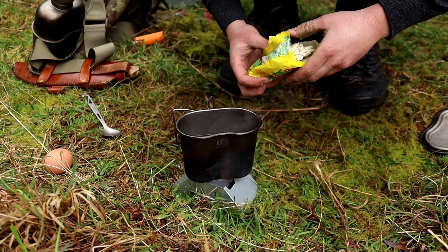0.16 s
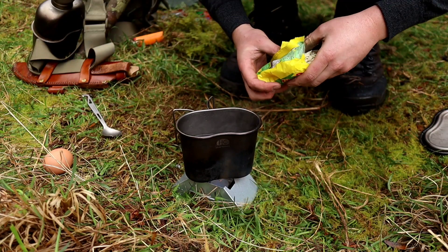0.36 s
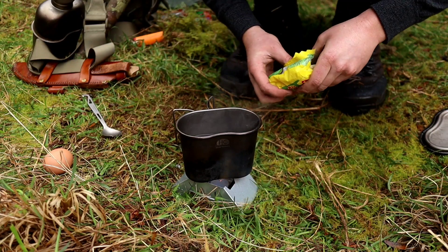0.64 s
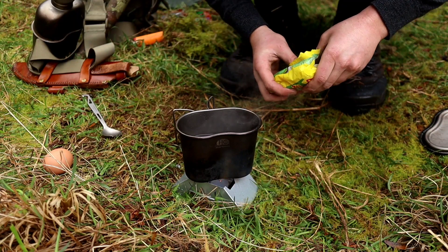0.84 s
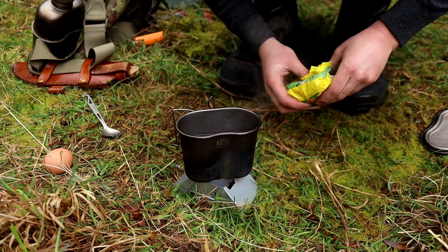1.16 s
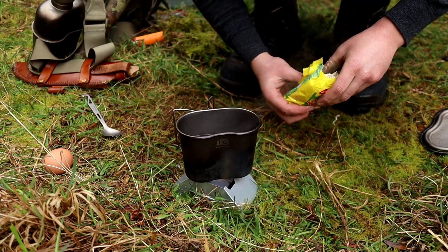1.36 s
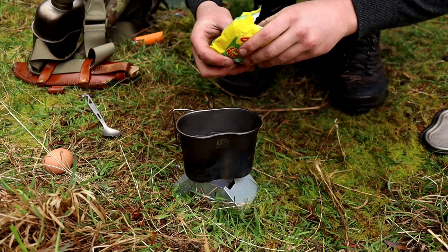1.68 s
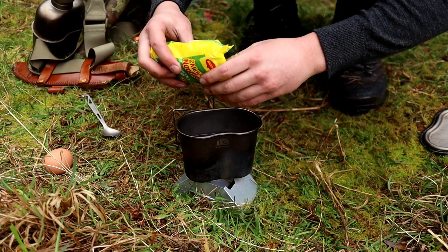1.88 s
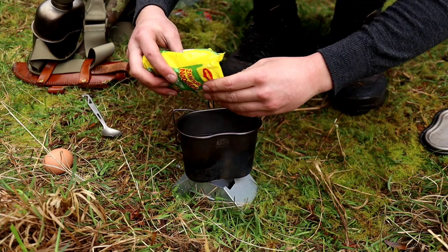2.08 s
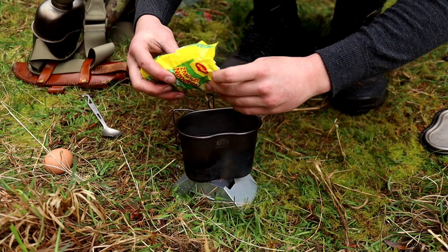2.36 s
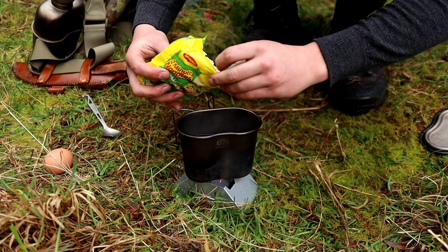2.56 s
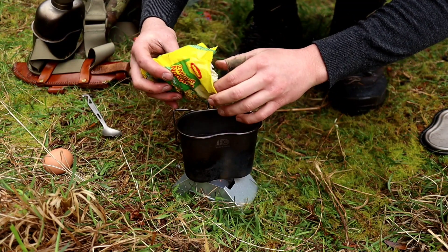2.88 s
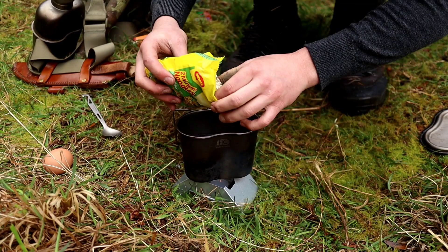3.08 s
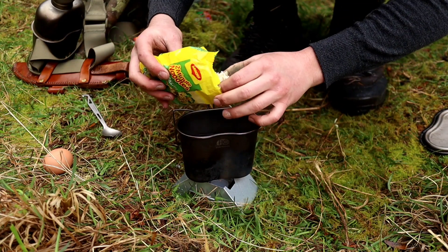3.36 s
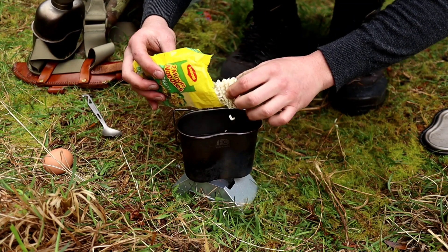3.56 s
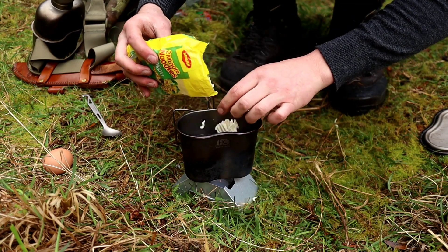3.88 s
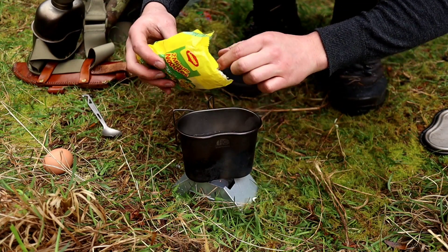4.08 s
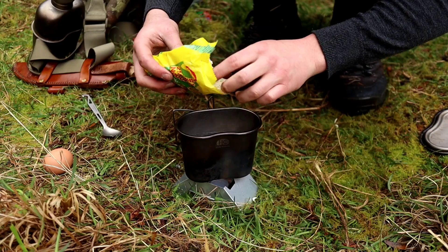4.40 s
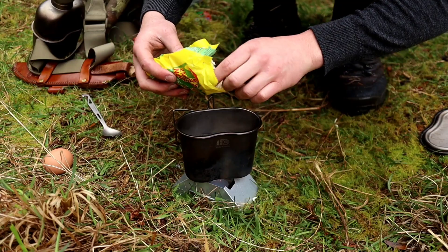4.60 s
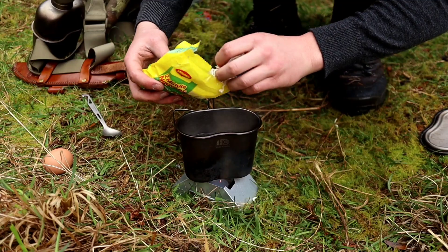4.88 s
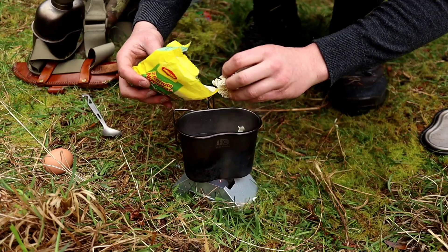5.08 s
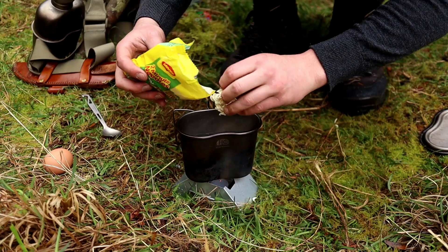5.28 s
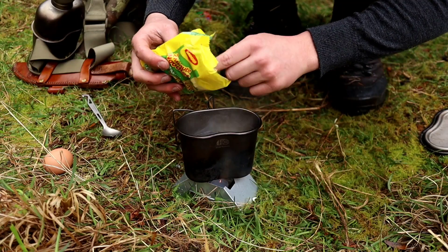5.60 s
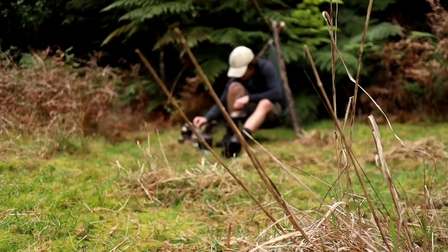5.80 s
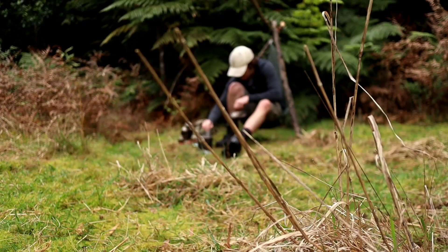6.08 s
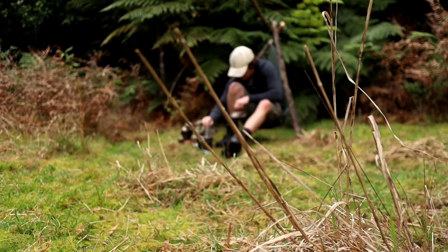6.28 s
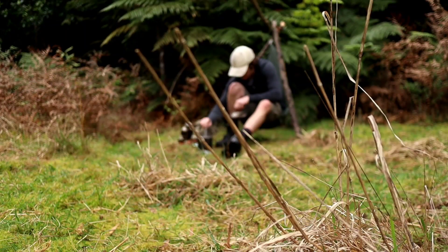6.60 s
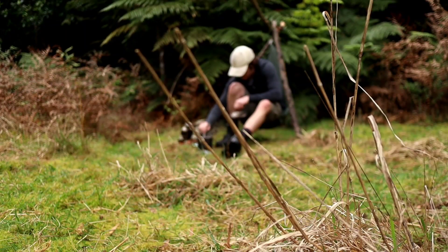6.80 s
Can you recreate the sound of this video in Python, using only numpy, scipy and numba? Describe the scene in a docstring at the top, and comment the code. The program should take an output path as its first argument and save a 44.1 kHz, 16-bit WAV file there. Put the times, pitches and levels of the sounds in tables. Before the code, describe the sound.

Close to the microphone, hands squeeze a plastic noodle packet in uneven bursts of crinkles and sharp little snaps. Early on, the dry block breaks with a loud crunch and a soft thump. Lighter rustling continues, a few pieces drop into a metal pot with brief ringing ticks, and crumbs slide along the metal. The close sounds then cut off, leaving faint forest hiss, a light breeze and one tiny tick.

```python
"""A plastic noodle packet is squeezed by hand: its film buckles in clumps of tiny cracks that excite the
hollow body, creases snap, and the dry block breaks and thumps against the palm. Pieces drop into a metal
cooking pot and ring its modes, crumbs slide along the metal, and the grassy clearing scatters the sound.
Near the end the listening point jumps far away, where only the soft hiss of the forest remains,
with a light breeze and one faint tick."""
import sys
import numpy as np
from scipy import signal
from scipy.fft import rfft, irfft, next_fast_len
from scipy.io import wavfile
from scipy.ndimage import map_coordinates
from numba import njit

SR = 44100
rng = np.random.default_rng(int(sys.argv[2]) if len(sys.argv) > 2 else 0)


def wav_out(sig):
    """Save sig, one row per channel (or a flat mono array), as 16-bit PCM at SR to the path in sys.argv[1]."""
    wavfile.write(sys.argv[1], SR, np.round(np.clip(np.atleast_2d(sig).T, -1, 1) * 32767).astype(np.int16))


N = 306318


def amp(db):
    return 10 ** (np.asarray(db) / 20)


def unit_rms(x):
    return x / np.sqrt(np.mean(x ** 2) + 1e-20)


def envelope(points):
    """Linear interpolation of (time [s], value) points, one value a sample."""
    return np.interp(np.arange(N) / SR, *np.transpose(points))


def wobble(rate_hz):
    """Smooth random modulation: a spline through Gaussian knots."""
    knots = rng.standard_normal(int(N * rate_hz / SR) + 4)
    return map_coordinates(knots, [np.arange(N) * rate_hz / SR])


def filtered(x, points, causal=False):
    """Spectral shaping by (frequency [Hz], gain [dB]) points; causal (minimum phase) keeps attacks sharp."""
    size = 2 * next_fast_len(N // 2 + 4096)
    hz, db = np.transpose(points)
    bin_hz = np.fft.rfftfreq(size, 1 / SR)
    gain = amp(np.interp(np.log(bin_hz + 1), np.log(hz + 1), db))
    if causal:
        cepstrum = irfft(np.log(gain), size)
        cepstrum[1:size // 2] *= 2
        cepstrum[size // 2 + 1:] = 0
        gain = np.exp(rfft(cepstrum))
    return irfft(rfft(x, size) * gain, size)[:N]


@njit
def add_sines(out, start, step, decay, size, phase):
    """Damped sines swell over their first cycle; step [rad] and decay [Np] are per sample."""
    for g in range(len(start)):
        for i in range(min(int(7 / decay[g]), len(out) - start[g])):
            swell = 1 - np.exp(-step[g] * i / 3)
            out[start[g] + i] += size[g] * swell * np.exp(-decay[g] * i) * np.sin(step[g] * i + phase[g])


def rings(*modes):
    """Superposition of damped modes: (onset [s], frequency [Hz], T60 [s], amplitude, phase [rad])."""
    onset, hz, t60, size, phase = (np.ravel(v).astype(float) for v in np.broadcast_arrays(*modes))
    start = np.clip(onset * SR, 0, N - 1).astype(np.int64)
    step = 2 * np.pi * np.clip(hz, 20, SR / 2.2) / SR
    decay = np.log(1000) / (np.abs(t60) * SR + 1)
    out = np.zeros(N)
    add_sines(out, start, step, decay, size, phase)
    return out


def crackle(flips, cracks, centre_hz, octaves, cycles, scatter_db):
    """Buckling: creases flip at random, each in a cluster of cracks that ring for a few cycles."""
    onset = rng.random((flips, 1)) * N / SR
    flip_pitch = rng.standard_normal((flips, 1))
    flip_db = scatter_db * np.minimum(rng.exponential(size=(flips, 1)), 3)
    delay = rng.laplace(.0006, .0016, (flips, cracks))
    phase = 2 * np.pi * rng.random((flips, cracks))
    crack_pitch = rng.standard_normal((flips, cracks))
    hz = centre_hz * 2 ** (octaves * (.67 * flip_pitch + .7 * crack_pitch))
    return unit_rms(rings(onset + delay, hz, cycles / hz, amp(flip_db - 2000 * np.abs(delay)), phase))


# Rustle of the handled film: (time [s], level [dB])
FILM_LEVEL = [(0.0, -46.5), (0.02, -57), (0.04, -51), (0.2, -55.0), (0.25, -49.5), (0.31, -57), (0.41, -47),
              (0.49, -55), (0.54, -44.5), (0.58, -42.5), (0.61, -49.0), (0.68, -33), (0.8, -41.5),
              (0.94, -54.5), (1.03, -45.5), (1.11, -59), (1.15, -38), (1.165, -22.5), (1.195, -14),
              (1.215, -33.5), (1.23, -39.5), (1.28, -49), (1.31, -34.5), (1.33, -52), (1.36, -38),
              (1.43, -49), (1.51, -42.5), (1.54, -48.5), (1.72, -63), (1.96, -48.5), (1.99, -53.5),
              (2.13, -49.5), (2.19, -52.5), (2.34, -54.5), (2.39, -42), (2.45, -54.0), (2.52, -54),
              (2.57, -51), (2.65, -58.5), (2.68, -41.5), (2.71, -58), (2.73, -38), (2.82, -50.5),
              (2.85, -44), (2.95, -51.5), (3.04, -45), (3.09, -45.5), (3.12, -56), (3.24, -45), (3.33, -52),
              (3.44, -33), (3.56, -49.0), (3.61, -42.5), (3.77, -45), (3.9, -51.5), (3.94, -58.5),
              (4.0, -55.5), (4.03, -71), (4.09, -52.5), (4.15, -39.5), (4.21, -65.5), (4.27, -60),
              (4.31, -37.5), (4.35, -57.5), (4.39, -42), (4.41, -44.5), (4.45, -54), (4.5, -54.5),
              (4.6, -38.0), (4.65, -56.5), (4.73, -45.5), (4.88, -48.5), (5.01, -37), (5.05, -52),
              (5.12, -56), (5.18, -39), (5.23, -42), (5.32, -65), (5.51, -63), (5.56, -54), (5.69, -61.5),
              (5.74, -30), (5.83, -50), (5.87, -29.0)]
# Spectral tilt of the film: (frequency [Hz], gain [dB])
FILM_SPECTRUM = [(900, 1), (1800, 4), (4000, 2), (8000, 1), (15000, 2.5)]
# Response of the packet's hollow body: (frequency [Hz], gain [dB])
BODY_SPECTRUM = [(100, -15), (200, -7), (450, -5), (620, -8), (1000, 2.5), (1500, 0), (2600, -40.5)]
# Strength of the body as the grip changes: (time [s], gain [dB])
GRIP_GAIN = [(0, 1.5), (1, -7), (1.6, -1), (3.3, -2), (4.3, -1.5), (5.87, -3.5)]
# Held tight around the block, the body sounds higher: (frequency [Hz], gain [dB])
TIGHT_SPECTRUM = [(250, -6), (900, -4.5), (1700, 4)]
# The loosening grip: (time [s], tightness [0-1])
TIGHTNESS = [(1.3, 0.94), (1.9, 0.06)]


def packet_rustle():
    """Bursts of buckling excite film and hollow body; hard squeezing merges the cracks into noise."""
    film_db = envelope(FILM_LEVEL)
    bursts = .25 * wobble(30) + .55 * wobble(75)
    merged = np.clip((film_db + 46.5) / 14, 0, 1)
    cracks = crackle(flips=3000, cracks=10, centre_hz=5260, octaves=1, cycles=4.1, scatter_db=4.5)
    cracks = unit_rms(filtered(cracks * amp(1.17 * bursts), FILM_SPECTRUM, causal=True))
    rush = unit_rms(filtered(rng.standard_normal(N) * amp(1.4 * bursts), FILM_SPECTRUM))
    film = (1 - .44 * merged) * cracks + (amp(-28.5) + .31 * merged) * rush
    body = crackle(flips=3000, cracks=3, centre_hz=770, octaves=.992, cycles=8.3, scatter_db=3)
    loose = unit_rms(filtered(body * amp(2.7 * bursts), BODY_SPECTRUM, causal=True))
    tight = unit_rms(filtered(loose, TIGHT_SPECTRUM, causal=True))
    tightness = envelope(TIGHTNESS)
    body = tightness * tight + (1 - tightness) * loose
    body_db = film_db + envelope(GRIP_GAIN) - .32 * (film_db + 51)  # the body swells less than the film
    return amp(film_db) * film + amp(body_db) * body


# Creases and noodles that snap: (time [s], level [dB], centre frequency [Hz])
SNAPS = [(0.0456, -29, 7160), (0.075, -24.5, 7750), (0.088, -26.5, 4470), (0.1112, -27, 4500),
         (0.2517, -23, 2550), (0.2918, -26, 6700), (0.316, -32, 6600), (0.42, -20.5, 2980),
         (0.4454, -30, 7100), (0.512, -29.5, 5000), (0.5298, -22, 6300), (0.5448, -22, 6000),
         (0.5666, -22, 4500), (0.574, -14.5, 7340), (0.639, -16, 7700), (0.6835, -25, 8100),
         (0.6892, -21, 2960), (0.7007, -22, 6640), (0.7114, -28, 6600), (0.7534, -30, 6660),
         (0.7928, -19.5, 4700), (0.8226, -22.5, 6600), (0.828, -36, 6300), (0.8665, -16.5, 7500),
         (0.9122, -20.5, 4750), (0.9532, -25, 4800), (0.9648, -29, 5000), (0.9853, -20.5, 3600),
         (1.0071, -25, 4600), (1.0127, -19, 2710), (1.0382, -11.5, 2750), (1.067, -22, 6500),
         (1.0732, -21.5, 4100), (1.1312, -24.5, 5530), (1.1382, -21, 5530), (1.1637, -1, 3500),
         (1.1817, -12.5, 3000), (1.219, -16, 6500), (1.2279, -2.5, 3000), (1.2556, -27, 2600),
         (1.3068, -17.5, 3950), (1.3107, -22.5, 2400), (1.3187, -25, 6600), (1.3469, -30, 6200),
         (1.4834, -23.5, 2800), (1.5192, -17, 4460), (1.6052, -25, 2900), (1.665, -21, 4570),
         (1.742, -22, 4000), (1.7796, -28, 3940), (1.9519, -29, 3200), (2.0259, -27, 4800),
         (2.0488, -21, 3670), (2.116, -22, 3600), (2.1462, -26.5, 6300), (2.3147, -19.5, 5460),
         (2.4214, -26, 5900), (2.5933, -25.5, 6800), (2.6122, -26.5, 6800), (2.6658, -11.5, 4100),
         (2.683, -25, 4100), (2.7212, -24.5, 8000), (2.7472, -25, 5100), (2.765, -38, 3100),
         (2.777, -21, 2900), (2.8358, -13.5, 5240), (2.8814, -29, 5000), (3.0123, -39, 5900),
         (3.026, -18.5, 6900), (3.0363, -21, 6400), (3.1026, -20, 5770), (3.1759, -25, 3100),
         (3.3628, -29, 5800), (3.3985, -18.5, 4380), (3.4382, -19, 5700), (3.4461, -16, 6400),
         (3.453, -22.5, 6300), (3.5173, -20.5, 4000), (3.5344, -21.5, 2600), (3.5884, -26, 6000),
         (3.6157, -16, 7800), (3.6555, -17, 2400), (4.0744, -33.5, 8000), (4.1256, -31, 6500),
         (4.1363, -35, 6040), (4.1568, -26.5, 2500), (4.2106, -36, 6000), (4.307, -19.5, 7160),
         (4.3137, -25, 3520), (4.3667, -25, 3500), (4.3836, -17.5, 5300), (4.3985, -29, 3700),
         (4.444, -17.5, 6430), (4.45, -11, 5060), (4.573, -21, 2900), (4.5868, -19, 7900),
         (4.6079, -20.5, 6240), (4.6402, -28, 6600), (4.7153, -20.5, 7000), (4.7494, -25, 4800),
         (4.8263, -21.5, 4900), (4.9702, -19.5, 5300), (5.0216, -23, 4370), (5.0328, -24.5, 2800),
         (5.083, -22, 3460), (5.105, -24, 3940), (5.1955, -19, 3600), (5.5274, -32, 3600),
         (5.5343, -22, 6840), (5.67, -34, 3200), (5.7335, -20, 2700), (5.745, -15, 5130),
         (5.8294, -28, 3200), (5.8568, -27, 3600), (5.8652, -17, 6400)]


def snaps():
    """Sudden stress release: tight clusters of cracks, each inside a weaker shiver of the film."""
    onset, snap_db, centre_hz = np.transpose(SNAPS)[:, :, None]
    bands = 14
    part = np.arange(2 * bands)
    shiver = part >= bands  # each band holds one crack and one shiver
    place, lag, phase, scatter = np.moveaxis(rng.random((len(SNAPS), 4, len(part))), 1, 0)
    hz = 450 * 33 ** ((part % bands + place) / bands)
    tear_s = .0005 + .004 * amp(snap_db)  # big snaps tear longer
    delay = np.where(shiver, .008 * (lag - .45), tear_s * lag)
    octaves = np.log2(hz / centre_hz)
    rolloff_db = np.where(octaves < 0, 5, 4.5) * np.abs(octaves)
    level_db = snap_db - 4 - rolloff_db - 8 * shiver + 11.7 * (scatter - .5)
    t60 = .0022 + 3.1 / hz  # low parts ring longer
    return rings(onset + delay, hz, t60, amp(level_db), 2 * np.pi * phase)


# Blows of the block against the palm: (time [s], level [dB], lower mode frequency [Hz])
THUMPS = [(1.226, -11, 520), (3.428, -27, 278), (3.608, -30, 380), (4.048, -35.5, 197), (4.146, -28, 457),
          (4.447, -34, 312), (5.02, -31.5, 220), (5.74, -22.5, 297)]


def palm_thumps():
    """A soft impact excites two close, heavily damped low modes."""
    onset, db, hz = np.transpose(THUMPS)[:, :, None]
    return rings(onset, hz * [1, 1.3], 9 / hz, amp(db + [0, -5]), 0)


# Pieces that strike the pot: (time [s], level [dB], frequency favoured by the contact point [Hz])
DROPS = [(3.902, -40, 1630), (3.9576, -21.5, 6000), (5.162, -34, 1450), (5.275, -39.5, 1770)]
# Modes of the pot: (frequency [Hz], level [dB], T60 [s])
POT_MODES = [(1227, -6, .04), (1670, -3, .13), (3112, 0, .075), (5539, -13, .06), (6821, -21, .14),
             (8484, -10, .06), (8888, -2, .04), (9502, -7, .045), (11300, 0, .03), (12080, -3, .05),
             (12850, -2, .045)]


def pot_impacts():
    """Modal excitation: bouncing pieces clatter and ring the pot; the contact point weights the modes."""
    out = np.zeros(N + SR)
    hz, mode_db, t60 = np.transpose(POT_MODES)
    t = np.arange(SR // 8) / SR
    bounce_s = np.array([[0], [.004], [.009]])
    for onset, db, favoured_hz in DROPS:
        level_db = db + mode_db - 10 * np.abs(np.log2(hz / favoured_hz)) - 900 * bounce_s
        phase = 2 * np.pi * rng.random(level_db.shape)
        out[:N] += rings(onset + bounce_s, hz, t60, amp(level_db), phase)
        clatter = np.diff(rng.standard_normal(len(t) + 1)) * amp(-60 * t / .045)
        out[round(onset * SR):][:len(t)] += amp(db - 2.5) * clatter
    return out[:N]


# Crumbs sliding into the pot: (time [s], level [dB])
CRUMB_LEVEL = [(5.24, -57.5), (5.3, -59), (5.52, -65.5), (5.55, -45), (5.63, -50), (5.68, -91)]


def sliding_crumbs():
    """Friction noise of fine crumbs on metal, shaped by the resonances of the pot wall."""
    wall = [(500, -25), (1250, 0), (2600, -13), (4600, -13),
            (5600, -5), (6500, -10), (8300, -6), (15000, -11)]
    level_db = envelope(CRUMB_LEVEL) + 2.1 * wobble(60)
    return amp(level_db) * unit_rms(filtered(rng.standard_normal(N), wall))


def ground_scatter(x, t60=.093, delay_samples=70):
    """Diffuse reflection from nearby grass and gear: convolution with a short noise tail."""
    t = np.arange(SR // 10) / SR
    tail = rng.standard_normal(len(t)) * amp(-60 * t / t60)
    return signal.fftconvolve(x, np.pad(tail / np.linalg.norm(tail), (delay_samples, 0)))[:N]


# Hiss of the forest: (frequency [Hz], gain [dB])
FOREST_SPECTRUM = [(41, -42.5), (70, -12.5), (158, -7), (232, -10.5), (260, -12.5), (417, -17), (1150, -14),
                   (1380, -12), (14500, -37), (15500, -37)]
# Breeze on the microphone: (time [s], level [dB])
BREEZE_LEVEL = [(0, -76), (1.5, -73), (3, -77.5), (6.45, -71.5), (6.75, -64.5), (6.95, -67)]


def forest(tick_s=6.812):
    """Stationary noise of far leaves, the fluctuating rumble of a breeze and one faint tick of a twig."""
    hiss = unit_rms(filtered(rng.standard_normal(N), FOREST_SPECTRUM))
    rumble = filtered(rng.standard_normal(N), [(15, -18), (30, -12), (120, -48.5)])
    breeze = unit_rms(rumble * amp(1.8 * wobble(10)))
    twig = rings(tick_s, [7000, 8600, 12500], .003, amp(-46), 0)
    return amp(-59) * hiss + amp(envelope(BREEZE_LEVEL)) * breeze + twig


# Microphone response to the near sources: (frequency [Hz], gain [dB])
MIC_RESPONSE = [(60, -31), (150, -7.5), (260, -1.5), (4800, 2), (6300, 2.5), (8500, 8), (9300, 3.5),
                (10100, -6.5), (11200, 2), (12600, 5.5), (15400, 0)]


def scene(jump_s=5.868):
    """Superposition: packet and pot sound until the listening point jumps away, the forest throughout."""
    near = packet_rustle() + snaps() + palm_thumps() + pot_impacts() + sliding_crumbs()
    near = filtered(near + amp(-13.5) * ground_scatter(near), MIC_RESPONSE, causal=True)
    return (near * (np.arange(N) < jump_s * SR) + forest())[None]


def record(dry, ceiling=.62, top_hz=15700):
    """Soft saturation rounds the highest peaks; a steep low-pass limits the bandwidth."""
    soft = dry[0] / (1 + np.abs(dry[0] / ceiling) ** 4) ** (1 / 4)
    return filtered(soft, [(top_hz, 0), (top_hz + 300, -90)])[None]


dry = scene()
out = record(dry)
wav_out(out)
```